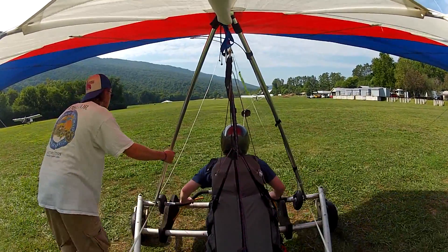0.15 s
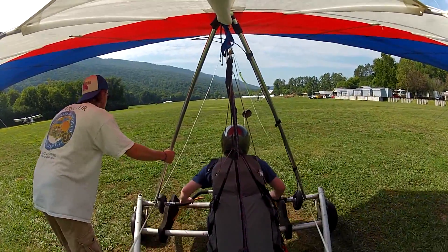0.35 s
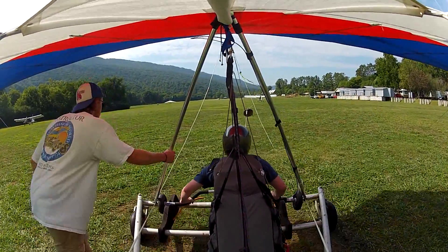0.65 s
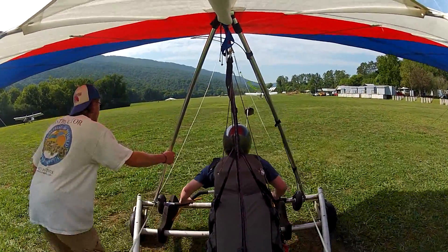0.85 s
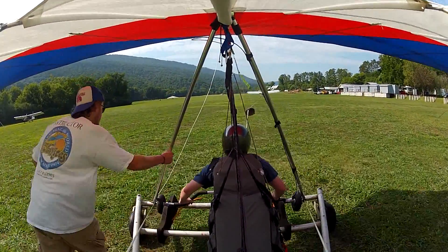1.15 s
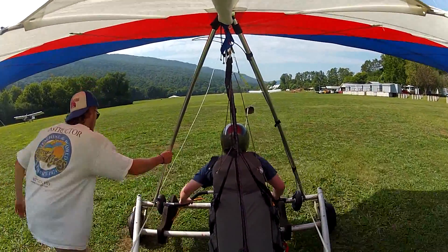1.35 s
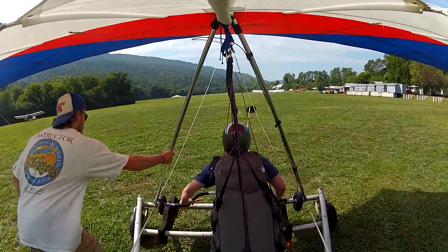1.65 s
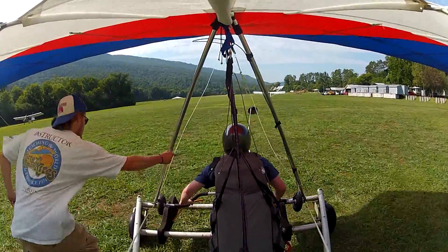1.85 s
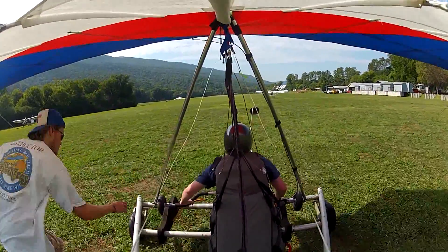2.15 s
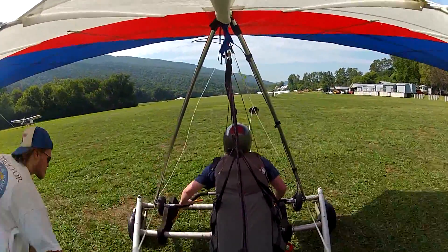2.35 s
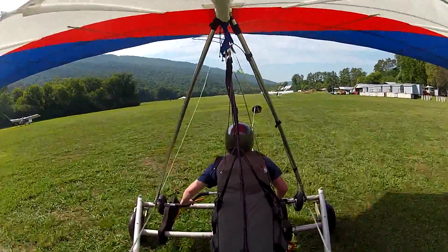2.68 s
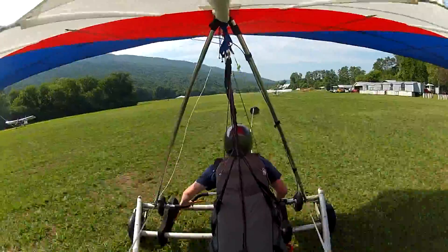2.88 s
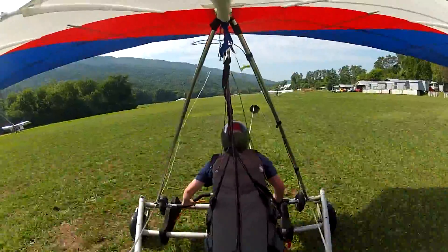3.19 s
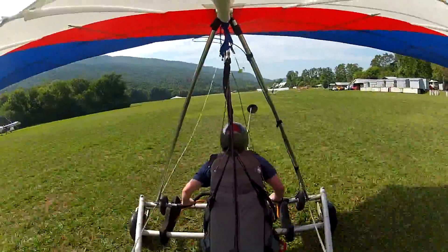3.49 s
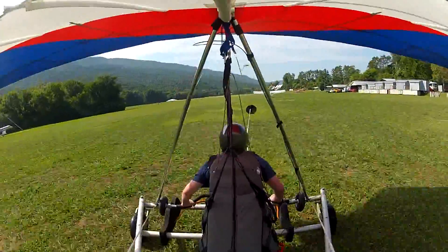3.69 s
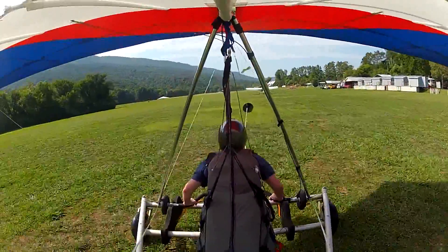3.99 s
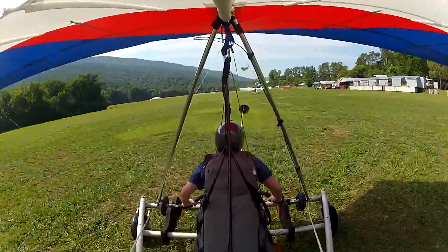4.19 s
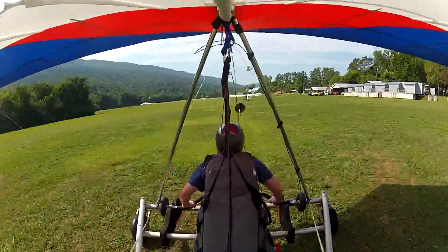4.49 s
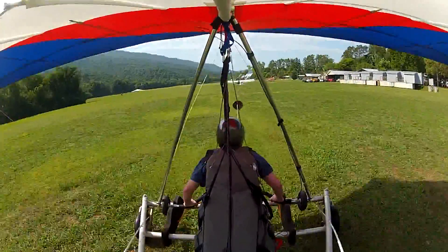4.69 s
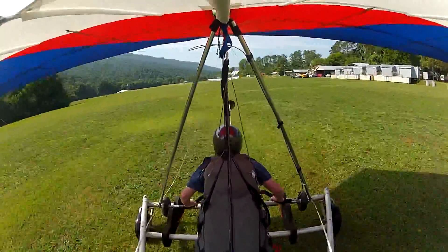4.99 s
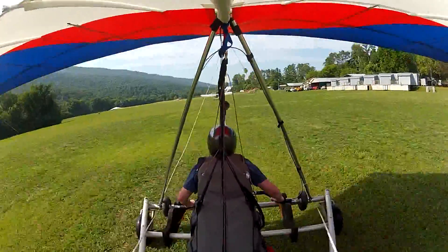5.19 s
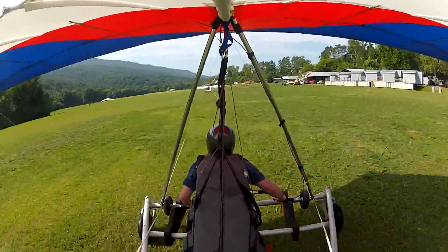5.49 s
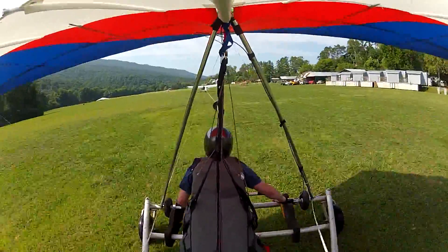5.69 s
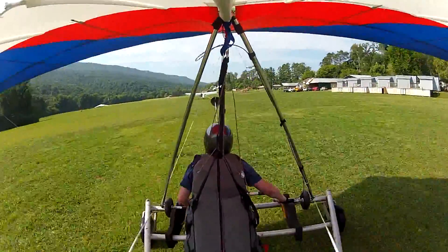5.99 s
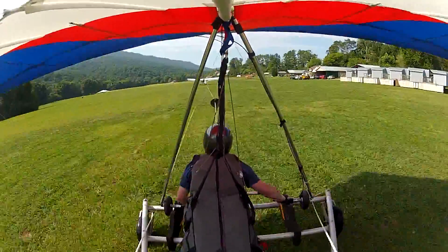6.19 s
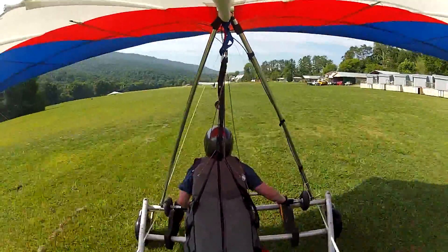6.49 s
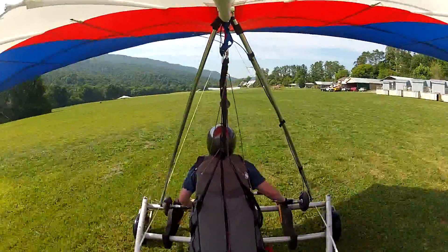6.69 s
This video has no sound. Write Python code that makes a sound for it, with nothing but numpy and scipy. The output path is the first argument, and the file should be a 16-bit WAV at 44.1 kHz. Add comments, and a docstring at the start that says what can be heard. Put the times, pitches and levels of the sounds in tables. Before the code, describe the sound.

A wheeled cart carrying a hang glider rattles, knocks and clacks over rough grass while a tow plane revs up and recedes and wind buffeting builds.

```python
"""A wheeled cart carrying a hang glider knocks and rattles over grass as it is towed off.
The microphone is close, in a camera's plastic case on the keel: bumps reach it through the frame as noise
bursts that thud, clack and ring. Filtered noise buffets the case as wind, louder as speed builds.
Farther off, sines make the tow plane, revving up and drawing away, and a far hum over the airfield's wash.
Hard jolts clip; the gain control ducks on loud peaks and climbs back at a steady rate."""
import sys
import numpy as np
from scipy import signal
from scipy.fft import rfft, irfft, next_fast_len
from scipy.io import wavfile
from scipy.ndimage import uniform_filter1d, map_coordinates

SR = 44100
rng = np.random.default_rng(int(sys.argv[2]) if len(sys.argv) > 2 else 0)


def inscribe(sig):
    """Save sig as 16-bit PCM at rate SR to the path in sys.argv[1].

    A 1-D sig is mono; a 2-D sig holds one channel per row.
    Samples are clipped to [-1, 1] before scaling.
    """
    pcm = np.round(np.clip(np.atleast_2d(sig).T, -1, 1) * 32767)
    wavfile.write(sys.argv[1], SR, pcm.astype(np.int16))


N = 302085
TIME = np.arange(N) / SR
FFT_SIZE = next_fast_len(N + SR // 2, True) // 2 * 2
HZ = np.fft.rfftfreq(FFT_SIZE, 1 / SR)

# Far: the tow plane revs up and draws away; levels before a shared trim:
# (time [s], propeller blade rate [Hz], propeller level [dB], exhaust level [dB])
TOW_PLANE = [(0, 59.24, -38, -29.5), (.8, 71.8, -34, -26.5), (1.5, 86.95, -32, -28),
             (1.8, 92.5, -34.5, -39), (2.3, 97.7, -32, -36), (2.8, 100.2, -33, -51),
             (6.85, 103.3, -53, -55)]
# At the case: airflow over it, level before a trim: (time [s], buffet level [dB])
WIND_LEVEL = [(0, -45), (0.9, -40), (1.5, -40), (2.6, -44), (2.87, -30), (3.72, -38.5), (3.89, -21.5),
              (4.1, -38), (4.35, -27.5), (4.55, -27.5), (4.66, -19), (4.85, -24.5), (4.97, -15.5),
              (5.3, -18.5), (5.63, -10.5), (5.85, -19.5), (6.3, -11), (6.85, -8.5)]
# Colour of the buffeting: (frequency [Hz], relative level [dB])
BUFFET_COLOUR = [(15, -18), (45, 2.5), (80, 2), (130, 1.5), (235, -5), (320, -9.5), (450, -10.5),
                 (750, -13), (1050, -17.5), (1400, -38), (4000, -48.5)]
# Close: sharp ticks from the rigging, before a trim: (time [s], relative level [dB])
RIGGING_TICKS = [(1.8198, -15), (1.837, -8), (1.937, -16), (2.6544, -24), (2.831, -20), (5.3285, -17),
                 (5.372, -11), (5.886, -18)]
# Colour of the rigging's ticks and crackle: (frequency [Hz], relative level [dB])
RIGGING_COLOUR = [(1200, -21), (2500, 3), (4800, 2), (7000, -8), (9000, 1), (14000, -26)]
# Close: the cart on rougher and smoother grass, levels before trims:
# (time [s], frame rumble level [dB], rattle level [dB])
CART_ROLL = [(0.05, -43, -50), (0.25, -29, -39.5), (0.5, -32.5, -39.5), (0.94, -28, -35),
             (1.15, -17.5, -28.5), (1.65, -18, -25.5), (1.9, -23, -28.5), (2.2, -14, -25), (2.95, -15, -28),
             (3.3, -20, -28.5), (3.7, -21.5, -34.5), (4.15, -21.5, -35), (4.47, -17.5, -28),
             (4.9, -29, -37), (5.1, -12.5, -23.5), (5.32, -16.5, -26), (6.199, -22, -29.5),
             (6.85, -18, -27)]
# Close: the loudest knocks of the frame on the cart, before trims:
# (time [s], relative level [dB], thud relative to clack [dB], 60 dB decay time of the buzz [s])
FRAME_KNOCKS = [(0.1131, -12.5, -7, 0.037), (0.192, 2, -20.5, 0.019), (0.2997, -4, -20, .019),
                (0.3586, 0.5, -10.5, 0.016), (0.4668, -2, -9, 0.046), (0.889, 2.5, -11.5, .023),
                (0.9921, -1.5, -6, 0.041), (1.042, -2.5, -18, 0.015), (1.0974, -5, -2, 0.055),
                (1.1263, -1, -3.5, 0.037), (1.2376, -3, -4, 0.057), (1.3199, -1.5, -7, 0.06),
                (1.3793, -0.5, -4.5, 0.054), (1.4102, -7.5, 1.5, .034), (1.484, -4.5, -2, 0.031),
                (1.5379, 2.5, -25, .036), (1.6212, -2, -3.5, 0.047), (1.6482, -2, -7, 0.034),
                (1.6886, -1, -5, 0.025), (1.7684, -2.5, -9, 0.046), (1.8063, 0, -4, 0.045),
                (1.8344, -1, -29, .03), (1.9365, 3.5, -36, 0.019), (2.0393, -8.5, 4.5, .021),
                (2.3715, -10.5, 7, 0.033), (2.4992, -2, -0.5, 0.021), (2.6544, -5.5, 1, 0.012),
                (2.8065, -4, -4.5, .03), (2.8315, 2.5, -5, 0.0091), (2.972, -5.5, 12, 0.02),
                (3.1597, 0, -12, 0.022), (3.2046, 0, -17, 0.017), (3.267, 9, -15, 0.017),
                (3.319, 7.5, -11, 0.017), (3.4166, 0, -9, .024), (3.524, 10, -5.5, .022),
                (3.699, 12, -1, 0.032), (3.924, 9.5, 0, 0.029), (4.023, 12, -9.5, 0.015),
                (4.146, 11, -12.5, 0.018), (4.2971, -1, -6, 0.019), (4.477, 16.5, -5.5, 0.031),
                (4.4894, 7, 5.5, 0.078), (4.765, -4.5, 5.5, 0.041), (5.0205, -0.5, -24, 0.011),
                (5.178, 14.5, 1.5, 0.015), (5.2011, 8.5, -7, 0.069), (5.7204, 2, -6.5, 0.017),
                (5.9249, -2, -1, 0.013), (6.022, 19.5, 2, .031)]
# Frame tubes ringing on after a blow: (frequency [Hz], relative level [dB], 60 dB decay time [s])
FRAME_TUBES = [(544, -29.5, 0.071), (722, -17.5, 0.18), (1054, -10, 0.059), (1562, -16.5, 0.047),
               (1900, -60, 0.046), (2440, -36, 0.23), (3100, -23, 0.061), (3937, -7, 0.024),
               (4770, -19, 0.024), (7090, -17.5, 0.016)]
# Round the microphone: broad response of case and frame: (frequency [Hz], gain [dB])
CASE_RESPONSE = [(60, -19), (270, -22.5), (370, -13.5), (480, -2), (680, -4), (900, -14), (1350, -18.5),
                 (2200, -14), (3900, -13.5), (4400, -25.5), (6100, -46.5), (7500, -31.5), (8300, -24.5),
                 (15200, -26)]
# Resonances on top of it; the one negative lift, near 12 kHz, is a notch in the sound and no resonance:
# (frequency [Hz], width [Hz], lift [dB])
LIFTS_AND_NOTCH = [(41.3, 25, 6.5), (560, 320, 3), (1177, 68, 4.5), (1820, 505, 11), (2996, 83, 8.5),
                   (4030, 150, 3.5), (8085, 410, 10), (9010, 470, 7), (10100, 190, 11.5),
                   (11324, 210, 16.5), (11924, 900, -28.5), (12520, 260, 5), (12560, 210, 6.5),
                   (14160, 460, 6.5)]

HUM_HZ, HUM_DB, HUM_FADE_DB_PER_S = 226.7, -42, 3.5  # a far hum: pitch, starting level, fade as it is left behind
TICK_T60_S, TICK_TRIM_DB = 0.017, -2.5  # rigging ticks
CRACKLE_DB = -26  # fine rigging crackle relative to the rattle table
# a loose fitting rocks to and fro: first tock, mean spacing, low pitch and level before scatter
ROCK_START_S, ROCK_PERIOD_S, ROCK_HZ, ROCK_DB = 0.16, 0.04, 790, -22
# even chatter between the tufts: final relative level, its rise, time constant of the rise
BED_DB, BED_RISE_DB, BED_RISE_S = 0, 9.5, 2
# rope pulling taut: midpoint, time scale, relative tube level before and after
TAUT_S, TIGHTEN_S, SLACK_DB, TAUT_DB = 1.12, 0.3, 3, -5.5
# lesser knocks: rate, mean level over the rattle table, mean thud relative to clack, buzz decay
SMALL_KNOCKS_PER_S, SMALL_KNOCK_DB, SMALL_THUD_DB, SMALL_T60_S = 13, 19.5, -8.5, 0.018
TOP_HZ = 15450  # the camera's upper band limit


def amp(db):
    """Decibels to gain."""
    return 10 ** (np.asarray(db) / 20)


def unit(x):
    """Scale to rms 1."""
    return x / np.sqrt(np.mean(x ** 2) + 1e-20)


def along(points):
    """Join (frequency [Hz], level [dB]) points on a log frequency axis."""
    hz, db = np.transpose(points)
    return np.interp(np.log(HZ + 1), np.log(hz), db)


def curves(rows):
    """One value per sample for each column after the time."""
    times, *columns = np.transpose(rows)
    return [np.interp(TIME, times, column) for column in columns]


def noise():
    """White noise for the whole scene."""
    return rng.standard_normal(N)


def wobble(rate):
    """A smooth random curve with rate knots a second."""
    knots = rng.standard_normal(int(N * rate / SR) + 4)
    return map_coordinates(knots, [TIME * rate])


def filtered(x, response):
    """Pass x through a frequency response."""
    return irfft(rfft(x, FFT_SIZE) * response, FFT_SIZE)[:N]


def causal(gain):
    """The minimum-phase response with this gain: it rings only after it is struck."""
    cepstrum = irfft(np.log(np.maximum(gain, 1e-6)))
    # fold the time-reversed half forward
    cepstrum[1:FFT_SIZE // 2] *= 2
    cepstrum[FFT_SIZE // 2 + 1:] = 0
    return np.exp(rfft(cepstrum))


def short_rms(x, size=128):
    """Running rms over about three milliseconds."""
    power = uniform_filter1d(x ** 2, size, mode="constant")
    return np.sqrt(np.abs(power) + 1e-12)


def chatter(rate, spread_db):
    """Tiny contacts at random times, rate a second on average, of uneven strength."""
    struck = rng.random(N) < rate / SR
    sign = rng.choice([-1, 1], N)
    return struck * sign * amp(spread_db * rng.standard_normal(N))


def ticks(rate, life, spread_db):
    """The swells of small random rattles, each rising fast and dying away over a few lives [s]."""
    t = np.arange(SR // 25) / SR
    swell = t / life * np.exp(-t / life)
    power = signal.fftconvolve(chatter(rate, spread_db) ** 2, swell ** 2)[:N]
    return unit(np.sqrt(np.abs(power)))


def recoloured(x, depth_db, size=256):
    """Contacts in different places stress different frequencies: a random gain over time and pitch."""
    spectrum = signal.stft(x, nperseg=size)[2]
    patches = uniform_filter1d(rng.standard_normal(spectrum.shape), size=4, axis=0)
    patches = uniform_filter1d(patches, size=5, axis=1)
    return signal.istft(spectrum * amp(depth_db * unit(patches)), nperseg=size)[1][:len(x)]


def field():
    """The faint, dull wash of the open airfield, with a far hum that wavers and fades."""
    colour = [(25, -24), (120, 1), (230, 4), (320, 0), (700, -11), (1500, -14.5), (6000, -43), (15000, -17.5)]
    wash = amp(-38.0) * unit(filtered(noise(), amp(along(colour))))
    hum_db = HUM_DB - HUM_FADE_DB_PER_S * TIME + 2.4 * wobble(6.45)
    hum = np.sqrt(2) * amp(hum_db) * np.sin(2 * np.pi * HUM_HZ * TIME)
    return wash + hum


def tow_plane():
    """The geared engine fires five times for every three propeller blades; distance leaves only low notes."""
    blade_hz, blade_db, exhaust_db = curves(TOW_PLANE)
    blade = 2 * np.pi * np.cumsum(blade_hz * (1 + 0.0048 * wobble(19))) / SR
    # propeller overtones fade as they climb out of the band that carries across the field
    notes = [(order * blade, blade_db - 4.9 * (order - 1) * blade_hz / 80) for order in range(1, 5)]
    notes.append((blade * 5 / 3, exhaust_db))
    # unequal cylinders add weak strands around the firing note
    notes += [(blade * order / 3, exhaust_db - 21.5) for order in range(4, 9)]
    return np.sqrt(2) * sum(amp(db - 4.5 + 2.6 * wobble(11.0)) * np.sin(phase) for phase, db in notes)


def wind(large_below_hz=300, lumps_db=2.5, large_db=1.0):
    """Eddies thump on the case in lumps, the large ones on their own beat; a thin hiss grows with them."""
    buffet_db, = curves(WIND_LEVEL)
    eddies = unit(filtered(noise(), amp(along(BUFFET_COLOUR))))
    large = filtered(eddies, 1 / (1 + (HZ / large_below_hz) ** 4))
    small = eddies - large
    eddies = small + large * amp(large_db + lumps_db * wobble(24))
    hiss_colour = [(6000, -40), (10500, -13), (11800, 12), (12400, 2), (13500, -29)]
    hiss = unit(filtered(noise(), amp(along(hiss_colour))))
    gusts_db = 1.16 * wobble(13) + 2.7 * wobble(70)
    return amp(buffet_db + 3.5) * unit((eddies + amp(-29.5) * hiss) * amp(gusts_db))


def rigging():
    """A few sharp noise ticks, and a fine crackle of contacts that grows as the cart shakes harder."""
    _, rattle_db = curves(CART_ROLL)
    colour = causal(amp(along(RIGGING_COLOUR)))
    swell = sum(amp(db - 60 * np.abs(TIME - s) / TICK_T60_S) * (TIME >= s) for s, db in RIGGING_TICKS)
    snaps = swell * unit(filtered(noise(), colour))
    crackle = unit(filtered(chatter(rate=700, spread_db=6), colour))
    return amp(TICK_TRIM_DB) * snaps + amp(rattle_db + CRACKLE_DB) * crackle


def rocking(life=0.002, bright_db=-9, count=10):
    """A loose fitting's hollow tocks as the cart starts: a low and a weaker high tone, both soon gone."""
    out = np.zeros(N)
    t = np.arange(SR // 25) / SR
    swell = t / life * np.exp(1 - t / life)
    for k, (late, sharp, hard) in enumerate(rng.standard_normal((count, 3))):
        s = ROCK_START_S + k * ROCK_PERIOD_S + 0.0072 * late
        low = swell * np.sin(2 * np.pi * (ROCK_HZ + 25 * sharp) * t)
        high_gain = amp(bright_db + rng.normal(0, 3.4))
        high = high_gain * swell ** 2 * np.sin(2 * np.pi * rng.normal(1980, 140) * t)
        out[int(s * SR):][:len(t)] += amp(ROCK_DB + 2.2 * hard) * (low + high)
    return out


def case_paths(split_hz=1150):
    """The two ways into the microphone: the frame's low thud and the case's bright clack."""
    lift_db = sum(db / (1 + (2 * (HZ - hz) / width) ** 2) for hz, width, db in LIFTS_AND_NOTCH)
    gain = amp(along(CASE_RESPONSE) + lift_db)
    low = 1 / (1 + (HZ / split_hz) ** 8)  # share of the power on the thud path
    return causal(gain * np.sqrt(low)), causal(gain * np.sqrt(1 - low))


def rolling(thud, clack):
    """Tufts set off small rattles over a bed of even chatter that grows to about their strength."""
    rumble_db, rattle_db = curves(CART_ROLL)
    bed_db = BED_DB - BED_RISE_DB * np.exp(-TIME / BED_RISE_S)
    tufts = ticks(rate=85, life=0.002, spread_db=4.0)
    bed = amp(bed_db + 0.57 * wobble(65))
    shaking = (tufts + bed) * amp(2.3 * wobble(14))
    # the frame's rumble follows the shaking less closely than the rattle does
    frame_force = chatter(rate=1500, spread_db=2.5) * shaking ** 0.41 * amp(2.8 * wobble(50))
    rumble = filtered(frame_force, thud)
    contacts = recoloured(chatter(rate=5000, spread_db=3), depth_db=3.0, size=128)
    rattle = filtered(contacts * shaking, clack)
    return amp(rumble_db - 2.4) * unit(rumble) + amp(rattle_db + 1.03) * unit(rattle)


def small_knocks():
    """Lesser knocks at uneven intervals, following the rattle level: rows like those of FRAME_KNOCKS."""
    chance = rng.random((120, 3))
    s = (np.arange(1, len(chance) + 1) + chance[:, 0]) / SMALL_KNOCKS_PER_S
    times, _, rattle_db = np.transpose(CART_ROLL)
    db = np.interp(s, times, rattle_db) + SMALL_KNOCK_DB + 7 * (chance[:, 1] - .5)
    low_db = SMALL_THUD_DB + 16 * (chance[:, 2] - .5)
    rows = np.column_stack([s, db, low_db, np.full(len(s), SMALL_T60_S)])
    return rows[s < N / SR]


def blows(rows, thud, clack, clack_db, thud_db, tubes_db, size=6144):
    """Each blow is a quickly dying buzz of contacts; frame and case respond and the tubes ring on."""
    out = np.zeros(N + size)
    t = np.arange(size) / SR
    paths = irfft(thud)[:size], irfft(clack)[:size]
    tubes = np.array([amp(db - 60 * t / t60) * np.sin(2 * np.pi * hz * t) for hz, db, t60 in FRAME_TUBES])
    # the slack frame rings freely; the pull of the tow rope makes the tubes ring more weakly
    slackness = (1 - np.tanh((TIME - TAUT_S) / TIGHTEN_S)) / 2
    slack_db = TAUT_DB + (SLACK_DB - TAUT_DB) * slackness
    for s, db, low_db, t60 in rows:
        start = int(s * SR)
        envelope = amp(-60 * t / t60) * (1 - np.exp(-t / 0.00037))
        force = recoloured(rng.standard_normal(size), depth_db=3.5) * envelope
        tube_gains = amp(tubes_db + slack_db[start] + rng.normal(0, 3.5, len(FRAME_TUBES)))
        sound = tube_gains @ tubes
        for path, level in zip(paths, (low_db + thud_db, clack_db)):
            ring = signal.fftconvolve(force, path)[:size]
            sound = sound + amp(level) * ring / short_rms(ring).max()
        # a faint lead-in a few milliseconds ahead softens each blow's onset
        lead = int(rng.uniform(0.0037, .011) * SR)
        out[start - lead:][:size] += amp(db - 22.0) * sound
        out[start:][:size] += amp(db) * sound
    return out[:N]


def scene():
    """Everything that reaches the microphone in its case, from the far field to the frame's knocks."""
    thud, clack = case_paths()
    surroundings = field() + tow_plane() + wind()
    cart = rigging() + rocking() + rolling(thud, clack)
    all_knocks = [*FRAME_KNOCKS, *small_knocks()]
    knocks = blows(all_knocks, thud, clack, clack_db=-11.0, thud_db=-5.5, tubes_db=-10.0)
    return (surroundings + cart + knocks)[None]


def gain_control(x, threshold_db, recovery_db_per_s, attack, deaf_below_hz):
    """Loud peaks pull the gain down within milliseconds, bass less so; it climbs back at a steady rate."""
    highpass = signal.butter(1, deaf_below_hz, "high", fs=SR, output="sos")
    sensed = signal.sosfilt(highpass, x)
    over_db = np.maximum(20 * np.log10(short_rms(sensed)) - threshold_db, 0)
    # hold each peak's reduction, less the recovery since
    recovery_db = recovery_db_per_s * TIME
    held_db = np.maximum.accumulate(over_db + recovery_db) - recovery_db
    pole = np.exp(-1 / (attack * SR))  # attack in seconds
    return x * amp(-signal.lfilter([1 - pole], [1, -pole], held_db))


def record(dry):
    """The camera rides its gain, clips at full scale and cuts steeply above its band limit."""
    ridden = gain_control(dry[0], threshold_db=-6.5, recovery_db_per_s=72.5, attack=0.0027, deaf_below_hz=83)
    clipped = np.clip(ridden, -1, 1)
    return filtered(clipped, 1 / (1 + (HZ / TOP_HZ) ** 120))[None]


dry = scene()
out = record(dry)
inscribe(out)
```